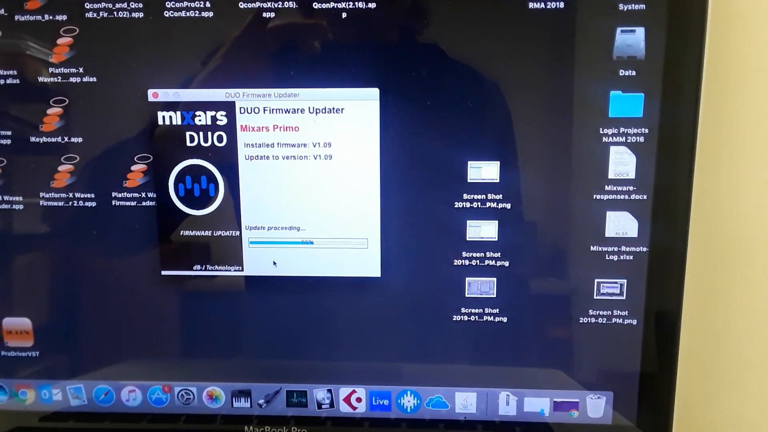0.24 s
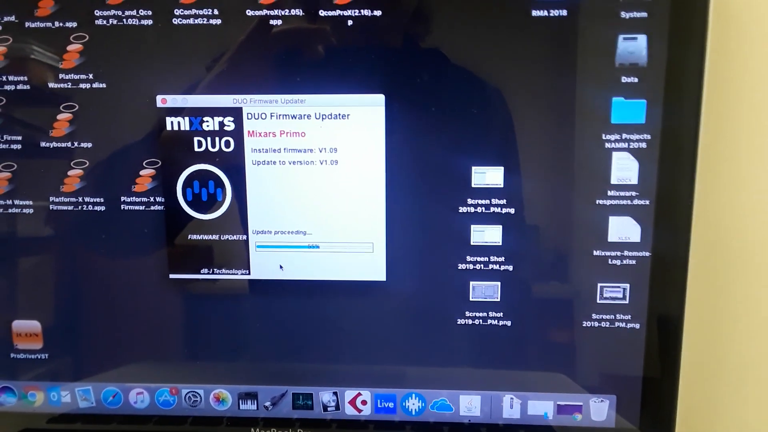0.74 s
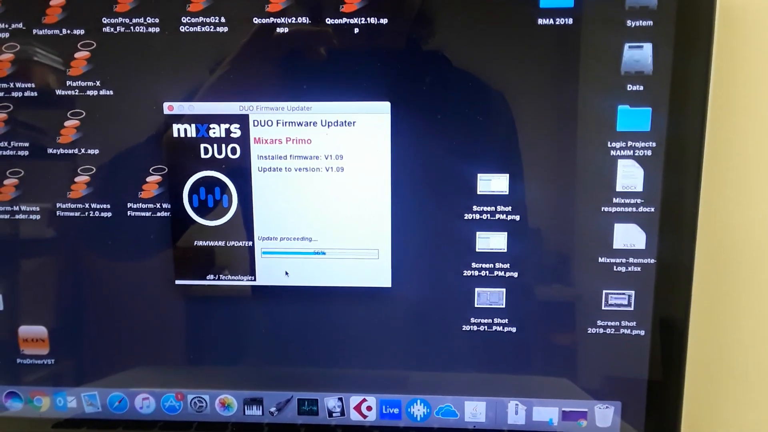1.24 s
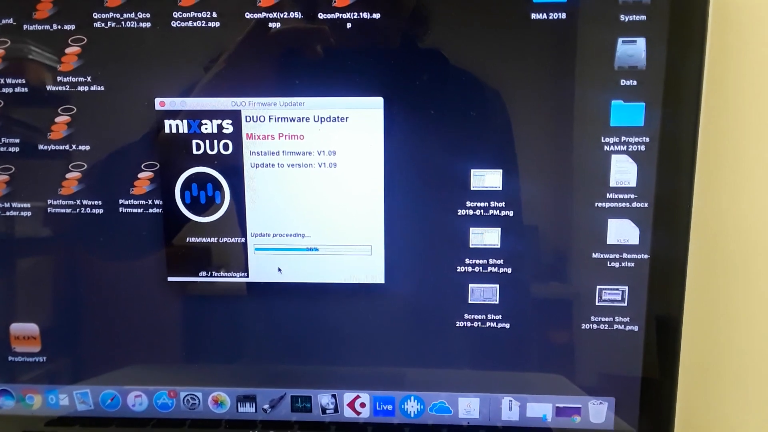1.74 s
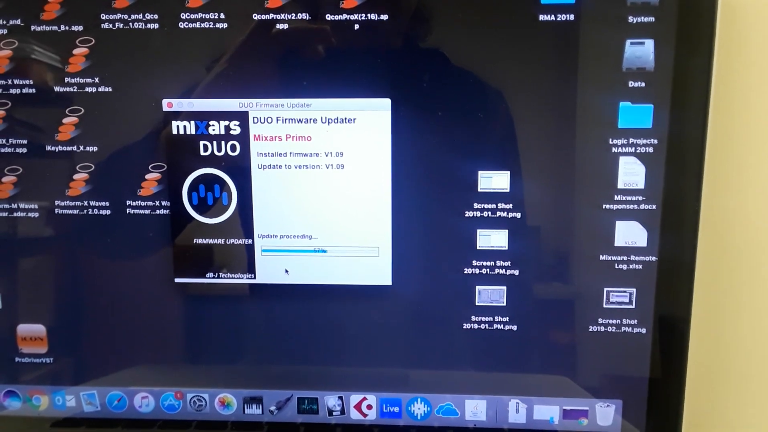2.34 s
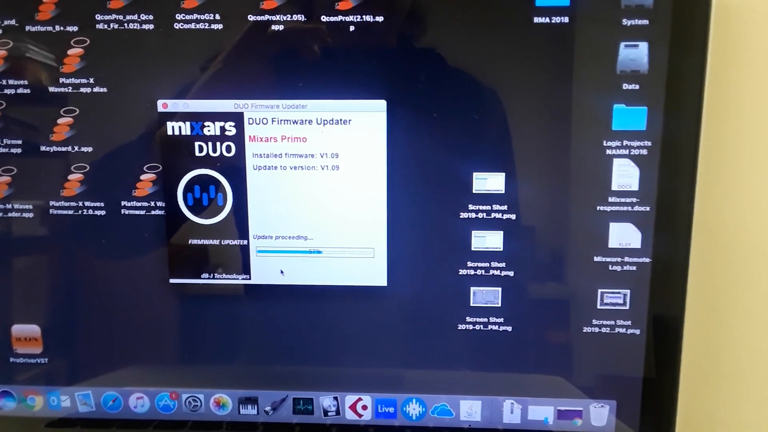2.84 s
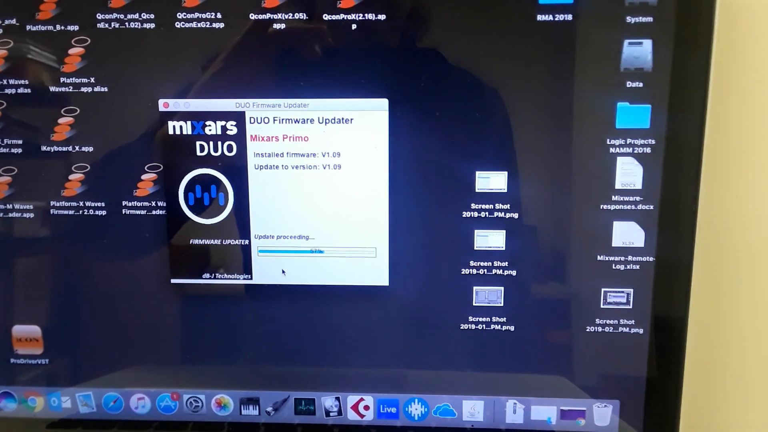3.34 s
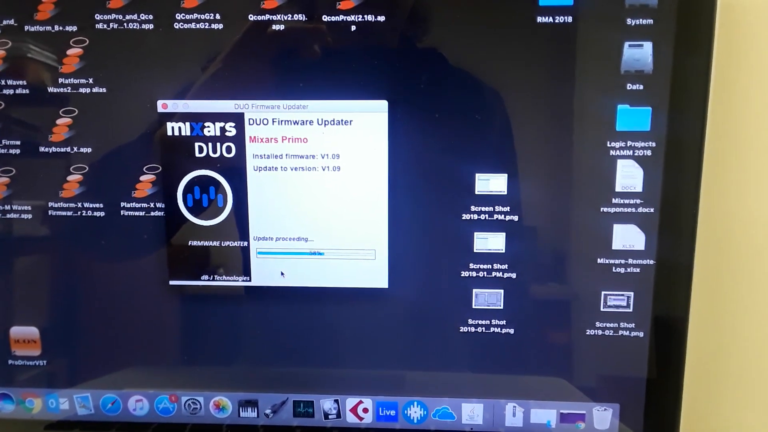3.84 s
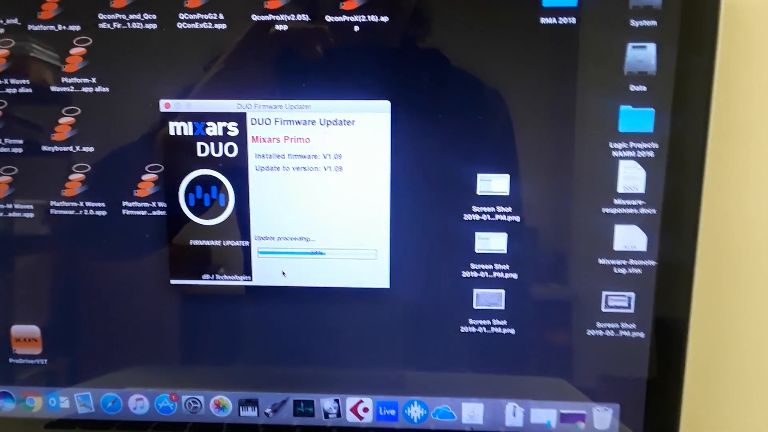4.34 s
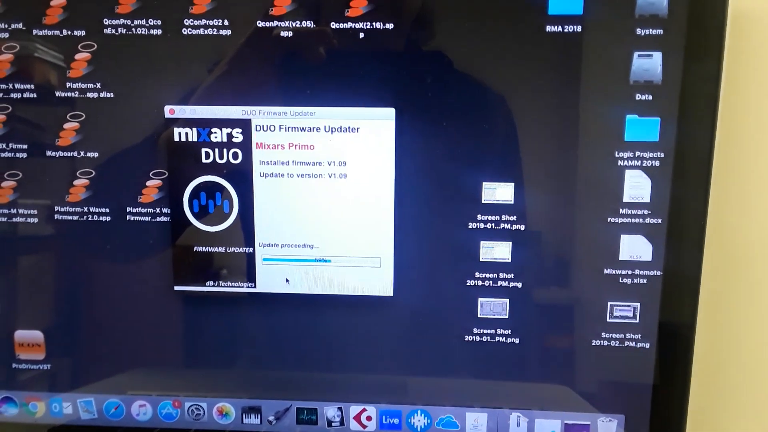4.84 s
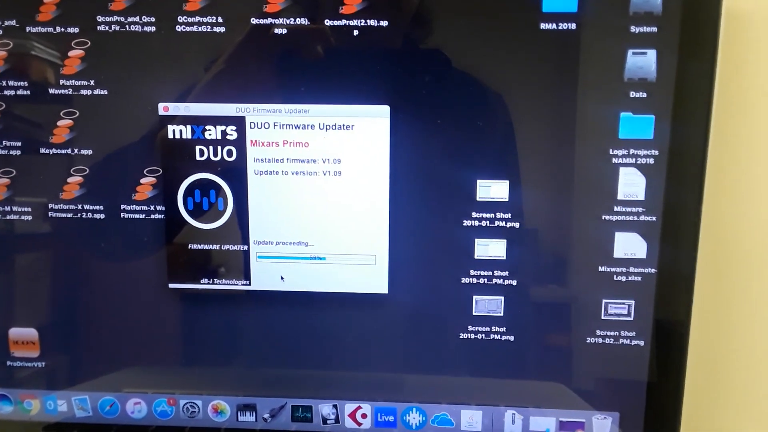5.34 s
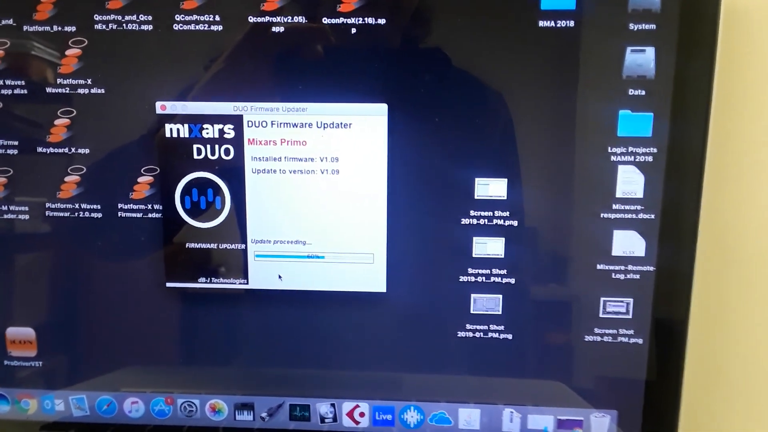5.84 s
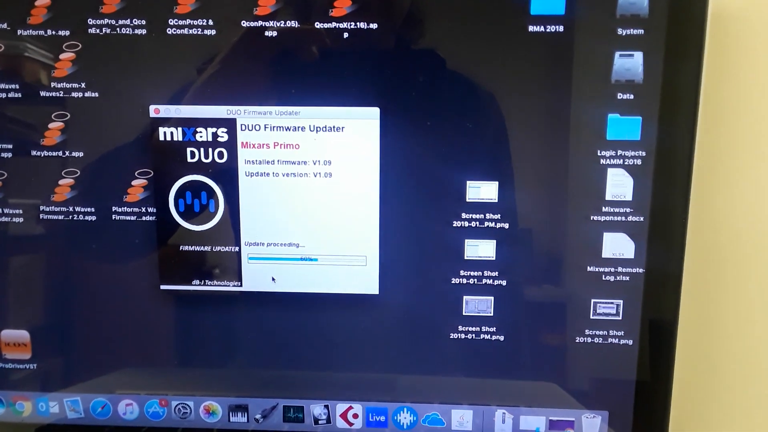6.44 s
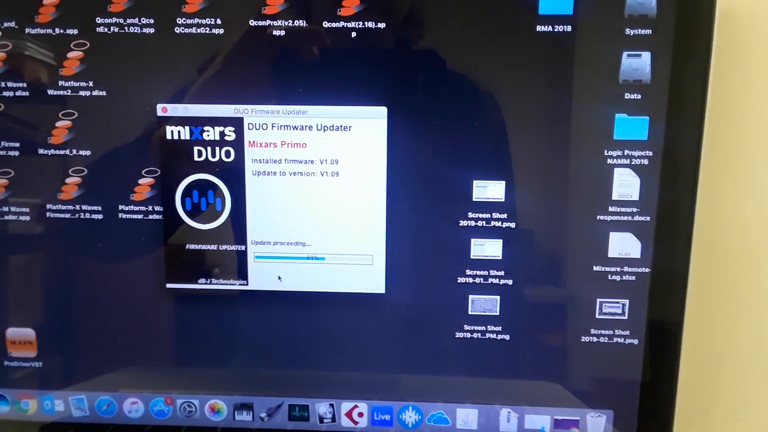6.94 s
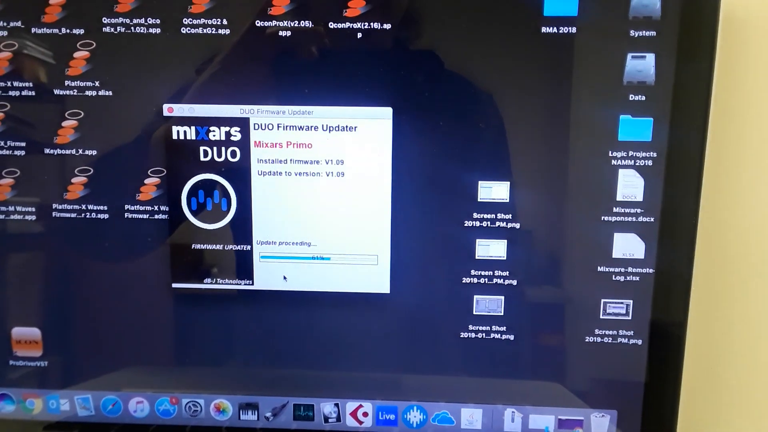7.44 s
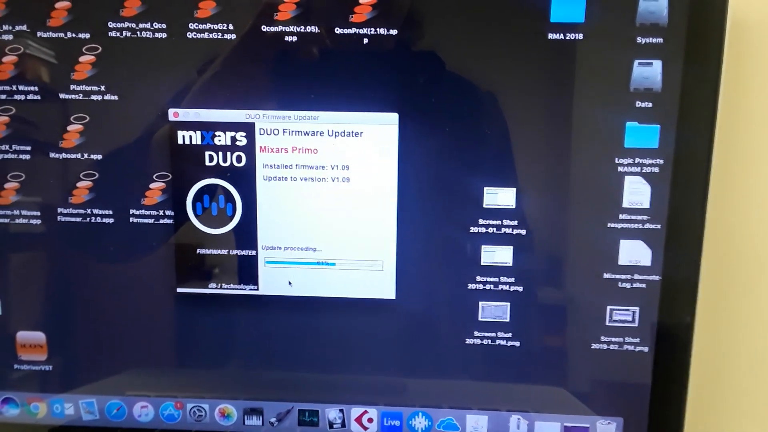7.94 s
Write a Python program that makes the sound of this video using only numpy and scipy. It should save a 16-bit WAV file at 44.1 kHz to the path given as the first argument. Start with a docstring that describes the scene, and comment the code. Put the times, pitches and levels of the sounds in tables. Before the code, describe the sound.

A quiet indoor room heard through a phone's stereo microphones: soft traffic rumble through walls, a steady low drone, hollow air noise and faint electrical buzz, with a small fan on the left. Thin gritty hiss switches on and off at the right. A muffled engine wavers early; just past five seconds another drops in pitch after a gear shift, then climbs and grows to the end.

```python
"""A vehicle outside a quiet room climbs in first gear, shifts, drops in pitch, then climbs again and grows.
Other engines come and go; each is a wavering sine whose level follows the booms of the room.
Filtered noise gives traffic rumble through the walls, resonant air and the microphone floor.
Sines give a steady drone, mains buzz and a small fan on the left; a late treble band rises and stays.
In the right microphone of a phone, gritty camera hiss switches on and off."""
import sys
import numpy as np
from scipy import signal
from scipy.fft import rfft, irfft, next_fast_len
from scipy.io import wavfile
from scipy.ndimage import uniform_filter1d

SR = 44100
rng = np.random.default_rng(int(sys.argv[2]) if len(sys.argv) > 2 else 0)


def store_pcm(level_fs):
    """Save levels as 16-bit WAV."""
    pcm = np.round(np.clip(level_fs, -1, 1) * 32767).astype(np.int16)
    wavfile.write(sys.argv[1], SR, np.atleast_2d(pcm).T)


N = 361619
TIME = np.arange(N) / SR  # s


def undb(db):
    """Amplitude ratio is ten to the power of the level in dB over twenty."""
    return 10 ** (np.asarray(db) / 20)


def walk(rate_hz):
    """Slow random modulation: random levels held 1 / rate s, averaged twice over that time; spread near 1."""
    hold = int(SR / rate_hz)
    steps = np.repeat(rng.standard_normal(N // hold + 1), hold)
    slewed = uniform_filter1d(uniform_filter1d(steps, hold), hold)
    return 1.146 * slewed[:N]


def shaped(gain_at):
    """Linear filtering of white noise: the power density per Hz becomes gain_at(Hz) squared."""
    size = next_fast_len(N)
    hz = np.arange(1, size // 2 + 2) * SR / size
    spectrum = rfft(rng.standard_normal(size)) * gain_at(hz)
    return irfft(spectrum, size)[:N] * np.sqrt(SR / 2)


def coloured(hz, db_per_hz):
    """Coloured noise: its spectral density runs straight between points in dB over log frequency."""
    return shaped(lambda f: undb(np.interp(np.log(f), np.log(hz), db_per_hz)))


def resonant(hz, width_hz):
    """Noise driving a steep resonance, width taken at half amplitude; rms 1."""
    noise = shaped(lambda f: 1 / (1 + ((f - hz * hz / f) / width_hz) ** 2))
    return noise / noise.std()


def tone(hz, lead_turns=0):
    """A sine whose phase is the running integral of its steady or moving frequency; rms 1."""
    turns = np.cumsum(hz + 0 * TIME) / SR + rng.random() + lead_turns
    return np.sqrt(2) * np.sin(2 * np.pi * turns)


def late(sound):
    """Propagation delay: the left microphone hears the sound 6 samples late."""
    return np.pad(sound, (6, 0), mode="edge")[:N]


def rumble():
    """Broadband transmission loss: walls pass chiefly the lows of traffic, with narrow hums on top."""
    # density of the rumble before it swells: hz, level_db_per_hz
    rumble_points = [(15, -120), (25, -103), (40, -89.5), (58, -83), (68, -84), (85, -76), (100, -76),
                     (120, -67.5), (145, -75), (170, -77.5), (210, -80.5), (260, -85), (320, -94),
                     (650, -112), (2000, -150)]
    # narrow noise bands: centre_hz, width_hz, rms_db
    hums = [(266.3, 9.3, -73.5), (293, 8.9, -72.5), (350.3, 12, -78)]
    swell = undb(1.84 * walk(5))
    sound = swell * coloured(*np.transpose(rumble_points))
    return sound + sum(undb(db) * resonant(hz, width_hz) for hz, width_hz, db in hums)


def engine(hz, db, waver_db, drift):
    """Low-pass transmission: walls pass only the lowest tone, which wavers in level and pitch."""
    level = undb(db + waver_db * walk(36))
    return level * tone(hz * (1 + drift * walk(15)))


def drone():
    """A periodic source: one tone of a steady machine in the building, which fades once for a moment."""
    pitch_hz, level_db = 182.8, -62.5
    dip_s, dip_width_s, dip_db = 5.1, .35, -14
    fade = dip_db * np.exp(-((TIME - dip_s) / dip_width_s) ** 2 / 2)
    return engine(pitch_hz, level_db + fade, waver_db=0.5, drift=0.0048)


def air():
    """Resonance under turbulent drive: moving air excites room and desk, partly coherent between sides."""
    # noise bands, levels before flicker: centre_hz, width_hz, left_db, right_db,
    # correlation (share heard alike, -1 to 1)
    air_bands = [(702, 89, -76, -75, 0.97), (818, 225, -72.5, -74.5, 0.68), (940, 72, -80, -81.5, 0.67),
                 (1112, 140, -80.5, -79, 0), (1313, 400, -69.5, -80.5, 0.38),
                 (1512, 137, -67.5, -82, -0.52), (1720, 256, -70.5, -80.5, 0.32),
                 (2270, 320, -76, -86.5, 0), (3120, 200, -91, -111, 0.4), (3520, 220, -83.5, -95, 0.43)]
    out = 0
    for hz, width_hz, left_db, right_db, alike in air_bands:
        shared, other = resonant(hz, width_hz), resonant(hz, width_hz)
        left = undb(left_db) * late(shared)
        right = undb(right_db) * (alike * shared + np.sqrt(1 - alike ** 2) * other)
        flicker = undb(.9 * walk(1.5) + 1.1 * walk(9))  # common to both sides
        out = out + flicker * np.array([left, right])
    return out


def mains_buzz():
    """Harmonic series: steady multiples of the mains frequency, with phase leads on the right."""
    mains_hz = 60.025
    # buzz tones: multiple, left_db, right_db, right_lead_turns
    buzz_tones = [(9, -91, -90, 0), (12, -87, -89, .1), (14, -82, -88, .1), (16, -92, -91, .1),
                  (18, -86, -81, .42), (20, -88, -92, .2), (24, -92, -92, .2), (26, -79, -92, .4),
                  (27, -85, -99, .3), (28, -83, -93, .3), (30, -87, -100, .3), (40, -93, -105, 0),
                  (46, -100, -110, 0)]
    out = 0
    for multiple, left_db, right_db, lead_turns in buzz_tones:
        level = undb([[left_db], [right_db]])
        out = out + level * tone(multiple * mains_hz, np.array([[0], [lead_turns]]))
    return out


def fan():
    """Rotating source: tones at shaft multiples drift together with the speed, 17 dB weaker on the right."""
    # shaft tones: multiple -> left_db
    shaft_tones = {37: -87, 38: -87, 39: -90, 40: -89, 41: -84, 42: -85}
    shaft_hz = 33.32 * (1 + 0.000992 * walk(0.96))
    left = sum(undb(db) * tone(multiple * shaft_hz) for multiple, db in shaft_tones.items())
    return np.outer([1, undb(-17)], left)


def noise_floor():
    """Incoherent noise: the smooth floor of room and microphones is independent on each side."""
    # floor density: hz, left_db_per_hz, right_db_per_hz
    floor_points = [(19.9, -120, -120), (152, -86.5, -86.5), (303, -93.5, -98.5), (500, -98, -99),
                    (990, -102, -102), (2030, -107, -108), (4000, -115.5, -114.5), (5200, -118.2, -117.4),
                    (6500, -117.8, -117.5), (8300, -118, -114.5), (10000, -121.5, -119),
                    (11500, -119, -115.5), (13100, -116, -112), (15800, -114, -110)]
    hz, *sides = np.transpose(floor_points)
    return np.array([coloured(hz, db) for db in sides])


def camera():
    """Amplitude-modulated noise: gritty electronic hiss is gated on and off and dips once every frame."""
    # hiss density before modulation: hz, level_db_per_hz
    hiss_points = [(4000, -129), (6000, -119), (7000, -112.5), (8400, -101.5), (10000, -105.5),
                   (11500, -100.5), (13200, -95.5), (14500, -99.5), (16000, -98)]
    # spells of hiss: start_s, end_s, level_db
    spells = [(.237, .803, 0), (.854, 5.262, 0), (5.281, 5.312, 0), (5.533, 5.782, 0), (5.899, 5.914, -4),
              (5.999, 6.016, -4), (6.752, 7.633, 0), (7.902, 8.3, 0)]
    frame_hz, split_hz = 59.885, 10000
    rise_s, decay_s, afterglow_s = .006, .011, .08
    on = 0
    for start, end, db in spells:
        rise = np.clip((TIME - start) / rise_s, 0, 1)
        on = on + undb(db) * rise * np.exp(-np.maximum(TIME - end, 0) / decay_s)
    step = 1 / (afterglow_s * SR)
    afterglow = signal.lfilter([step], [1, step - 1], on)
    from_dip = (TIME * frame_hz - .37 + .5) % 1 - .5  # in frames
    dip_db = -4.2 * np.exp(-from_dip ** 2 / .05 ** 2 / 2)

    hiss = coloured(*np.transpose(hiss_points))
    low = signal.sosfiltfilt(signal.butter(4, split_hz, fs=SR, output="sos"), hiss)
    # the lower and the upper hump crackle partly on their own
    gritty_low = undb(0.87 * walk(500) + .8 * walk(40)) * low
    gritty_high = undb(1.5 * walk(600) + 1.0 * walk(60)) * (hiss - low)
    shared_grit_db = 1.58 * walk(700) + .5 * walk(8)
    level = np.maximum(on, 0.22 * afterglow) * undb(dip_db + shared_grit_db)
    return np.outer([0, 1], level * (gritty_low + gritty_high))


def room_db(hz):
    """Modal response: power gains of the room's booms add to the gain between them."""
    # room resonances: centre_hz, half_width_hz (at half amplitude), peak_db
    booms = [(86, 9.5, 0.5), (101.5, 4.8, -0.3), (120.23, 3.3, 3.5), (127.5, 4.7, -3), (137.6, 4, -3.5)]
    between_db = -12.5
    power = undb(between_db) ** 2
    for centre_hz, half_width_hz, db in booms:
        power = power + (undb(db) / (1 + ((hz - centre_hz) / half_width_hz) ** 2)) ** 2
    return 10 * np.log10(power)


def fade_db(start, end, fade_s):
    """Exponential growth and decay: 0 dB from start to end, falling 20 dB per fade time outside."""
    outside_s = np.maximum(np.maximum(start - TIME, TIME - end), 0)
    return -20 * outside_s / fade_s


def engine_spell(start, speeds, lifts, end, hz, climb, db):
    """Firing rate sets pitch: it holds, climbs, then relaxes exponentially towards coasting after a lift."""
    coast_hz, coast_s = 113.4, .19
    throttle_db, throttle_s = 5.5, 0.18  # louder once it speeds up
    revs_hz = hz + climb * (np.clip(TIME, speeds, lifts) - speeds)
    revs_hz = coast_hz + (revs_hz - coast_hz) * np.exp(-np.maximum(TIME - lifts, 0) / coast_s)
    load_db = throttle_db * np.clip((TIME - speeds) / throttle_s, 0, 1)
    level_db = db + load_db + room_db(revs_hz) + fade_db(start, end, fade_s=0.14)
    return engine(revs_hz, level_db, waver_db=3.0, drift=0.0116)


def first_gear_and_other_engines():
    """Superposition: the main vehicle's first gear and the other engines add as tones."""
    # spells, level before throttle and room: start_s, speeds_up_s, lifts_off_s, end_s,
    # firing_hz, climb_hz_per_s, level_db; a lift time beyond the end of the scene is never reached.
    # The second row is the main vehicle in first gear, up to its gear change
    spells = [(.4, 1.85, 2.55, 3.45, 120, 38, -58), (4.7, 4.7, 5.03, 5.15, 131, 45, -52),
              (6.7, 6.7, 9, 7.15, 158.5, 18, -52), (7.35, 7.35, 9, 9, 76, 11, -63)]
    return sum(engine_spell(*row) for row in spells)


def second_gear():
    """Gear ratio sets pitch: after the shift the same vehicle starts lower, climbs fast, then evenly."""
    start_s, start_hz = 5.16, 78.86
    bite_hz_per_s, bite_s, climb_hz_per_s = 47, .36, 15.4  # revs jump as the clutch bites
    start_db, growth_db_per_s = -48.5, 4.0  # before the room's gain; it draws nearer
    t = TIME - start_s
    bite_hz = bite_hz_per_s * np.minimum(t, bite_s)
    climb_hz = climb_hz_per_s * np.maximum(t - bite_s, 0)
    revs_hz = np.maximum(start_hz + bite_hz + climb_hz, 20)
    level_db = start_db + growth_db_per_s * t + room_db(revs_hz)
    level_db = level_db + fade_db(start_s, TIME[-1], fade_s=0.05)
    return engine(revs_hz, level_db, waver_db=1.5, drift=0.0038)


def treble_lift():
    """Incoherent band noise: faint hiss rises late and stays, unrelated left and right."""
    centre_hz, width_hz, level_db = 6000, 5000, -79.5
    start_s, rise_s = 7.13, .3
    rise = np.clip((TIME - start_s) / rise_s, 0, 1)
    sides = np.array([resonant(centre_hz, width_hz), resonant(centre_hz, width_hz)])
    return undb(level_db) * rise * sides


def scene():
    """Superposition at two microphones: low sound is coherent, with the left side a little later."""
    low = rumble() + drone() + first_gear_and_other_engines() + second_gear()
    low_pair = np.array([late(low), low])
    return low_pair + air() + mains_buzz() + fan() + noise_floor() + camera() + treble_lift()


def record(dry):
    """Band limiting: the phone cuts the top with a steep elliptic low-pass at 15800 Hz."""
    return signal.sosfilt(signal.ellip(14, .2, 80, 15800, fs=SR, output="sos"), dry)


dry = scene()
out = record(dry)
store_pcm(out)
```